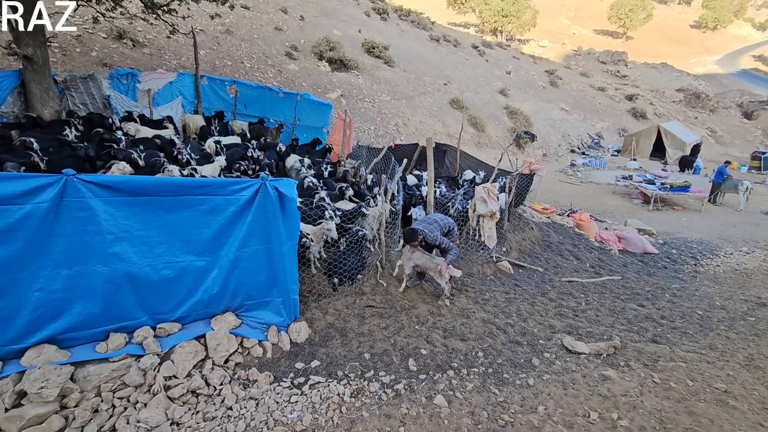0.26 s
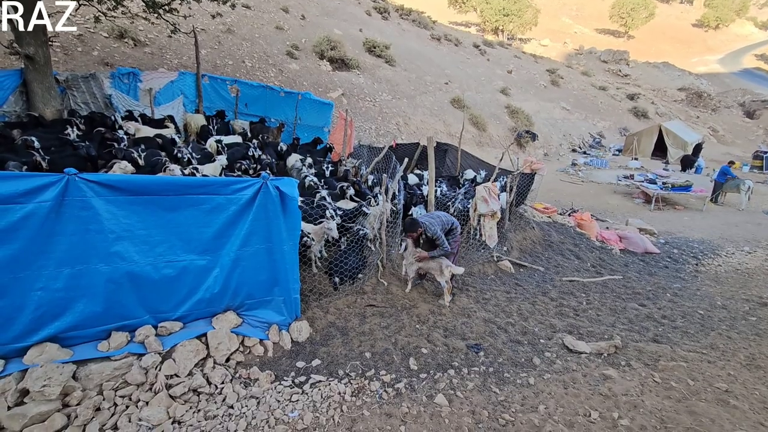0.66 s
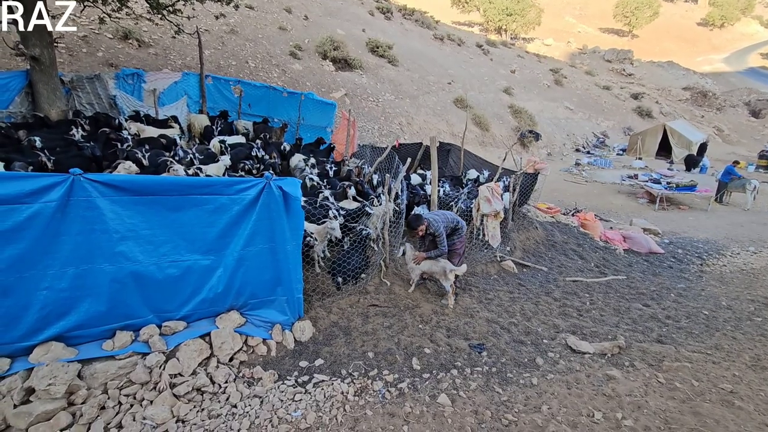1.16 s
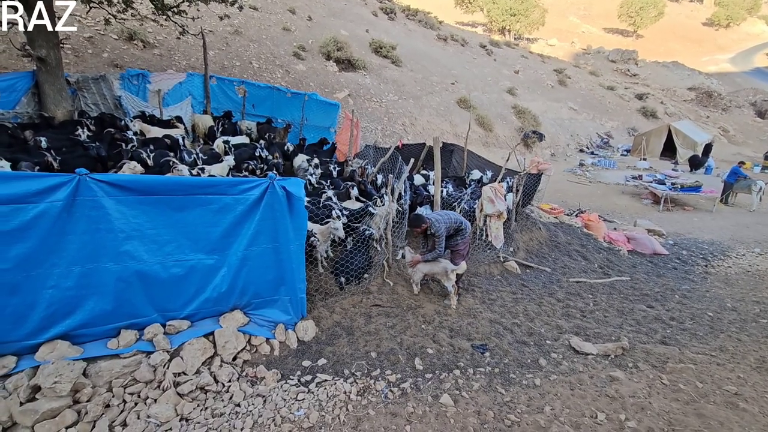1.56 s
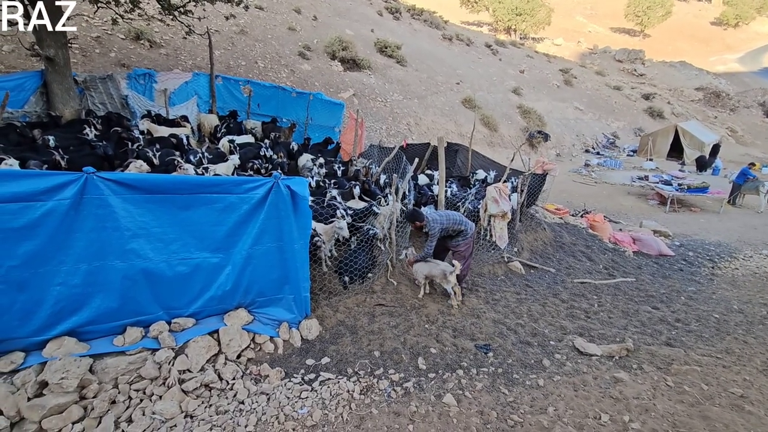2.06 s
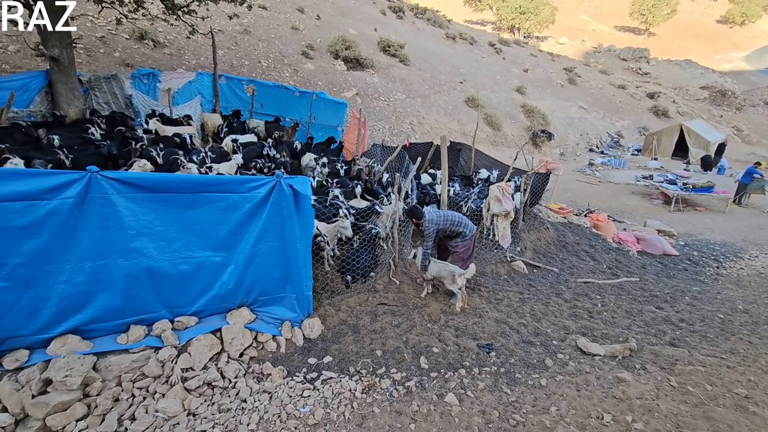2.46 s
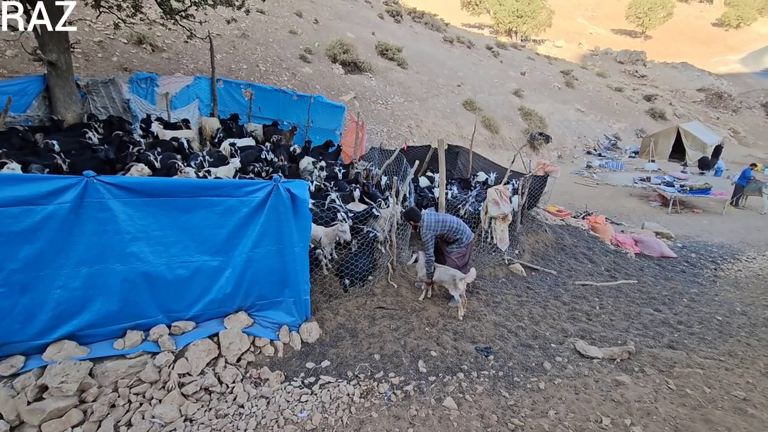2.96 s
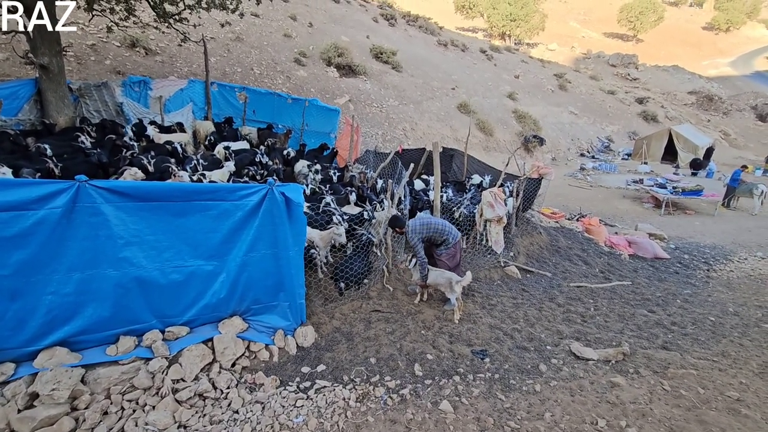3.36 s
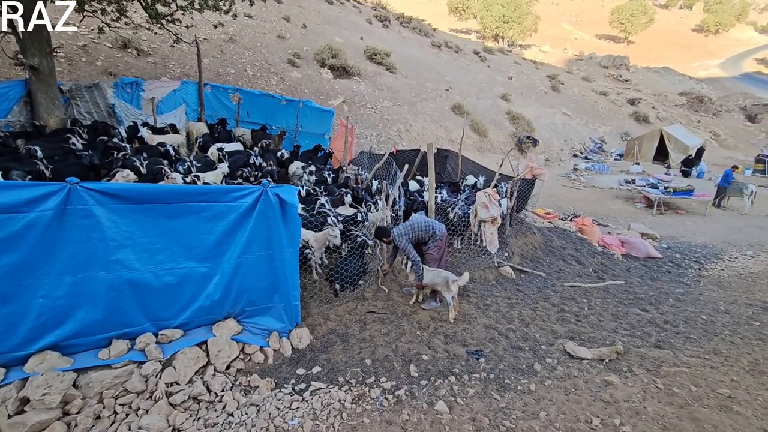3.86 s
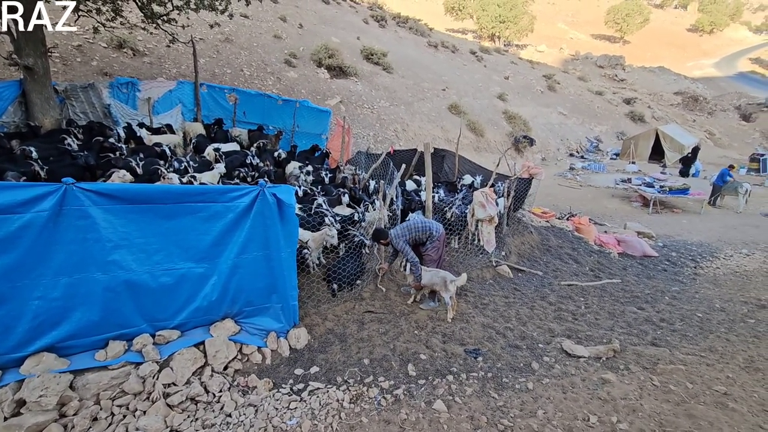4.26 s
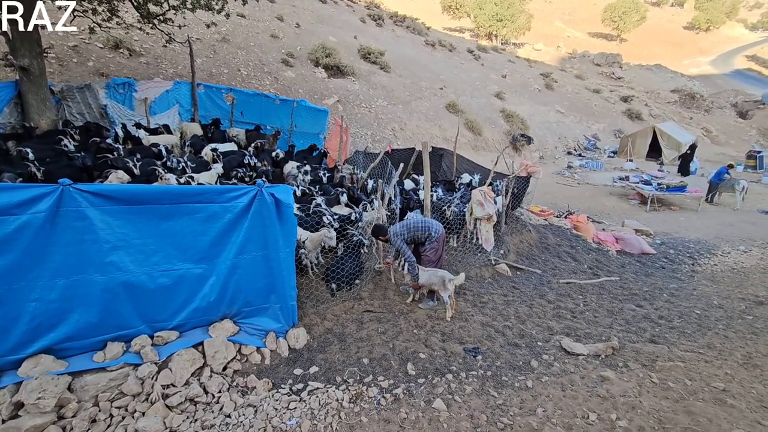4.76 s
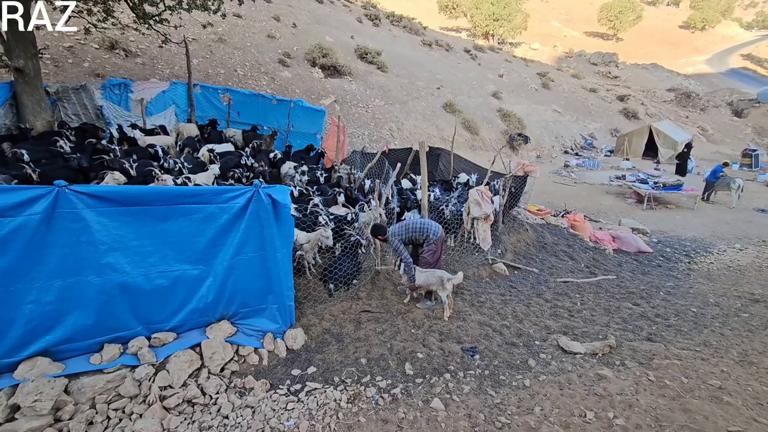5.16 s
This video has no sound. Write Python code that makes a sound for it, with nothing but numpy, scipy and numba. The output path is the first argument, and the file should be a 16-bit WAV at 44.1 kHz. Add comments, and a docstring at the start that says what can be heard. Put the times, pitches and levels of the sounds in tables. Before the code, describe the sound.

A young goat whimpers and gives one long bleat, then gritty footsteps, a small bell and one dog bark sound over a low outdoor rumble.

```python
"""A low, gusty rumble lies over a dry hillside, with dull shuffles around a pen. A young goat to the
right whimpers twice, then draws out one arching bleat that breaks at the top: vocal fold pulses through
moving throat resonances. Close by, grit snaps, feet scuff stony ground and a small collar bell tinkles.
Late on, a herd dog gives one gruff bark that the slopes throw back, a bird whistles faintly three
times, and a loose stone rocks against its neighbours."""
import sys
import numpy as np
from scipy import signal
from scipy.fft import rfft, irfft
from scipy.io import wavfile
from scipy.ndimage import uniform_filter1d, map_coordinates
from numba import njit

SR = 44100
rng = np.random.default_rng(int(sys.argv[2]) if len(sys.argv) > 2 else 0)


def output_pcm(signal):
    """Save a mono or channel-first signal as 16-bit PCM at the path in sys.argv[1].

    Samples are clipped to [-1, 1] before scaling.
    """
    pcm = np.clip(np.atleast_2d(signal).T, -1, 1) * 32767
    wavfile.write(sys.argv[1], SR, np.round(pcm).astype(np.int16))


N = 237950
T = np.arange(N) / SR

# closed-mouth notes, the first two run together: (start [s], end [s], pitch [Hz], level [dB],
# yelp time [s], yelp width [s], yelp rise [Hz], strain at the yelp [dB])
WHIMPER_NOTES = [(0.325, 0.375, 540, -55, .341, .016, 65.2, -9),
                 (0.385, .55, 562, -46.5, .411, 0.018, 71.3, -12.5),
                 (0.703, 0.919, 523, -44, .9, .036, 201, -26)]
# the long bleat: (time [s], level [dB], mouth opening [dB], strain in the upper harmonics [dB])
BLEAT_EFFORT = [(0.913, -45.5, -12.5, -24.5), (.96, -46.5, -12.5, -25), (1.02, -54, -8, -14),
                (1.07, -45.5, -16.5, -16), (1.12, -50.5, -6.5, -12), (1.458, -53, -5.5, -8),
                (1.6, -54, -2, -2.5), (1.75, -51.5, -8.5, -5), (1.85, -52.5, -13, -10),
                (1.99, -46.5, -14.5, -13), (2.025, -52, -14, -26)]
BREAK_S, CRACK_S = 1.508, 1.915  # the voice breaks atop the arch and cracks as the air runs out


def undb(db):
    """Decibels to gain."""
    return 10 ** (np.asarray(db) / 20)


def curves(rows):
    """The columns of a table, joined by straight lines in time."""
    s, *columns = np.transpose(rows)
    return [np.interp(T, s, c) for c in columns]


def after(s, fade):
    """A ramp from 0 to 1, centred on time s."""
    return np.clip((T - s) / fade + .5, 0, 1)


def blend(a, b, share):
    """Crossfade from a to b."""
    return a + (b - a) * share


def envelope(s, attack, hold, release, curve):
    """Full from s for the hold; attack and release are the times to 20 dB below that."""
    away = np.maximum(s - T, 0) / attack + np.maximum(T - s - hold, 0) / release
    return undb(-20 * np.minimum(away, 10) ** curve)


def unit(x):
    """Scale to rms 1."""
    return x / np.sqrt(np.mean(x ** 2))


def steady(x):
    """Hold the short-time rms at 1."""
    return x / np.sqrt(np.abs(uniform_filter1d(x * x, size=1300)) + 1e-12)


def noise():
    """White noise."""
    return rng.standard_normal(N)


def walk(rate):
    """Smooth random drift of rms 1 that turns about rate times a second."""
    drift = np.interp(T * rate, np.arange(N), noise())
    return unit(uniform_filter1d(drift, max(1, int(SR / rate))))


def band(x, lo_hz, hi_hz, order=4):
    """Band-pass."""
    sos = signal.butter(order, [lo_hz, min(hi_hz, SR / 2 - 1000)], "band", fs=SR, output="sos")
    return signal.sosfilt(sos, x + 1e-18)


def colour(x, points):
    """Minimum-phase EQ through points of (frequency [Hz], gain [dB])."""
    hz, db = np.transpose(points)
    size = 4096
    bins_hz = np.arange(size // 2 + 1) * SR / size
    log_gain = np.log(undb(np.interp(np.log(bins_hz + 1), np.log(hz), db)))
    cepstrum = irfft(log_gain) * np.r_[1, np.full(size // 2 - 1, 2), np.zeros(size // 2)]
    return signal.fftconvolve(x, irfft(np.exp(rfft(cepstrum))))[:N]


@njit
def resonance(x, hz, width):
    """State-variable band-pass whose centre moves, gain 1 at the centre."""
    y, mid, low = np.empty(len(x)), 0., 0.
    for i in range(len(x)):
        g, damping = np.tan(np.pi * hz[i] / SR), width / hz[i]
        v = (mid + g * (x[i] - low)) / (1 + g * (g + damping))
        mid, low = 2 * v - mid, low + 2 * g * v
        y[i] = damping * v
    return y


def formant(x, hz, width_hz):
    """A moving resonance with steep skirts."""
    return resonance(resonance(x, hz, float(width_hz)), hz, float(width_hz))


def place(x, lag_ms, pan_db):
    """Pan to stereo: the left is later by lag_ms and louder by pan_db."""
    late = map_coordinates(x, [np.arange(N) - lag_ms * SR / 1000], order=3)
    return np.array([late * undb(pan_db / 2), x * undb(-pan_db / 2)])


def outdoors(x, t60, wet_db, dull_hz):
    """Diffuse reverb from the ground and the slope, one tail for each side."""
    decay = undb(-60 * T / t60)
    tails = [unit(band(noise(), 220, dull_hz, order=1) * decay) / np.sqrt(N) for _ in range(2)]
    return undb(wet_db) * np.array([signal.fftconvolve(x, tail)[:N] for tail in tails])


def background():
    """A gusty rumble, the low stir of the flock and a faint breeze."""
    bed = [(0, -52.5), (1.3, -50.5), (2.6, -52.5), (3.7, -50.5), (5.39, -57)]  # rumble between gusts: (time [s], level [dB])
    gusts = [(.19, 5.5, 0.035), (.38, 10.5, 0.044), (.63, 9, 0.12), (.86, 6, 0.1), (1.8, 9, 0.35),
             (2.35, 5.5, .04), (4.16, 7, 0.042)]  # swells: (time [s], rise [dB], half length [s])
    rumble_eq = [(11, -45.5), (18, -7.5), (38, 2), (68, 0.5), (85, -2.5), (128, -23), (200, -30),
                 (260, -54.5), (440, -120)]  # deep bass: (frequency [Hz], gain [dB])
    air_eq = [(80, -10.5), (150, -13.5), (200, -7), (260, -1.5), (340, -11.5), (450, -18), (700, -6),
              (1000, -19), (2200, -25.5), (4000, -32), (8000, -40.5), (10000, -46.5), (16000, -43.5)]  # hillside air: (frequency [Hz], gain [dB])
    rumble_db = curves(bed)[0] + sum(db * np.exp(-((T - s) / half) ** 2) for s, db, half in gusts)
    common, apart = (unit(band(colour(noise(), rumble_eq), 19, 170)) for _ in range(2))
    rumble = undb(rumble_db) * (place(common, 0.24, -4) + undb(-13) * np.array([apart, -apart]))
    centre, left, right = (unit(colour(noise(), air_eq)) for _ in range(3))
    air = undb(-67.5) * (0.5 * centre + 0.82 * np.array([left, right]))
    stir = band(air, 90, 600, order=2) * undb(0.5 + 2.6 * walk(14))
    breeze = band(air, 960, 22000, order=2) * undb(1.36 * walk(30))
    return rumble + stir + breeze


def bumps():
    """Soft, dull shuffles around the pen: short swells of low noise."""
    shuffles = [(0.188, -69, 278, 0.31), (1.047, -62.5, 875, 0.041), (1.159, -61.5, 830, 0.068),
                (1.161, -60, 222.6, .08), (1.322, -63, 288, 0.041), (2.137, -51.5, 750, 0.014),
                (2.791, -50, 218, 0.18), (2.803, -67.5, 334, 0.46), (4.362, -56.5, 240, 0.1),
                (5.176, -62, 152, 0.49), (5.212, -64.5, 289, 0.73), (5.265, -57.5, 1070, 0.11)]  # (time [s], level [dB], rough top of the band [Hz], length [s])
    out = np.zeros(N)
    for s, db, hz, length in shuffles:
        swell = np.cos(np.pi * np.clip((T - s) / length, -.5, .5))
        out += undb(db) * swell * steady(band(noise(), hz * 0.59, hz * 0.99, order=2))
    return out


def larynx(hz, rough, jitter, shimmer, doubling, flutter_hz, breath, harmonics):
    """Vocal fold pulses; roughness unsettles them, alternates strong and weak, and adds puffs of air."""
    phase = 2 * np.pi * np.cumsum(hz * (1 + jitter * rough * walk(flutter_hz))) / SR
    pulses = unit(sum(np.cos(k * phase) for k in range(1, harmonics + 1)))
    size = 1 + rough * (shimmer * walk(flutter_hz) + doubling * np.cos(phase / 2) * walk(30))
    return pulses * size + breath * rough * noise() * (1 + np.cos(phase))


def whimpers():
    """Voice controls: sagging nasal notes, weak and hoarse at the ends; a yelp parts the lips."""
    sag_hz_per_s, scoop_hz, scoop_s = 430, 90, .022
    notes = np.array(WHIMPER_NOTES)
    current = np.maximum(np.searchsorted(notes[:, 0], T, side="right") - 1, 0)
    start, end, note_hz, db, yelp_s, width, rise_hz, yelp_db = notes[current].T
    yelp = np.exp(-((T - yelp_s) / width) ** 2)
    # the pitch slides up into each note and drops out of it
    scoop = np.exp(-np.maximum(np.minimum(T - start, end - T), 0) / scoop_s) * (1 - yelp)
    hz = note_hz - sag_hz_per_s * (np.clip(T, start, end) - start) + rise_hz * yelp - scoop_hz * scoop
    level_db = db - 9.5 * scoop - 3.5 * yelp
    mouth_db = blend(-33.5, -13.5, np.maximum(yelp, scoop))
    strain_db = blend(-27, yelp_db, yelp) + 14 * scoop
    lower_hz, upper_hz, upper_db = (np.full(N, value) for value in (1960, 3350, -30))  # the nose
    rough = .33 + .25 * scoop
    return np.array([hz, level_db, mouth_db, strain_db, lower_hz, upper_hz, upper_db, rough])


def bleat():
    """Voice controls: the throat follows the arch of the pitch, clear going up, hoarse coming down."""
    arch = [(0.918, 556.7), (1.002, 569.7), (1.124, 622.2), (1.508, 686), (1.644, 654.2), (1.786, 584),
            (1.9, 549.7), (2.002, 478), (2.01, 482.6)]  # the bleat's melody: (time [s], pitch [Hz])
    mid_hz, quaver_hz = 606, 68.85
    hz, = curves(arch)
    level_db, mouth_db, strain_db = curves(BLEAT_EFFORT)
    opened, broken, cracked = after(0.95, 0.077), after(BREAK_S, 0.058), after(CRACK_S, 0.011)
    # two resonances lie wide apart, ride the pitch once the mouth opens, then jump at the crack
    lower_hz = blend(blend(2220, 2470 + 1.9 * (hz - mid_hz), opened), 2520, cracked)
    upper_hz = blend(blend(3950, 3124 + 3.8 * (hz - mid_hz), opened), 3570, cracked)
    upper_db = blend(-3.5, 4, np.maximum(cracked, breaking()))
    rough = blend(blend(.11, .26, broken), .52, cracked)
    tired = np.clip((T - BREAK_S) / (CRACK_S - BREAK_S), 0, 1)
    quaver = np.sin(2 * np.pi * np.cumsum(quaver_hz * (1 + 0.087 * walk(20))) / SR)
    hz = hz * (1 + .016 * tired * quaver)
    return np.array([hz, level_db, mouth_db, strain_db, lower_hz, upper_hz, upper_db, rough])


def breaking():
    """The break in the voice: sudden, held briefly, then easing."""
    return envelope(BREAK_S + 0.0059, attack=0.0034, hold=.1, release=0.095, curve=0.77)


def goat():
    """A nearly pure hum with the mouth shut; opening and strain bring out the upper resonances."""
    throat_eq = [(330, -41), (480, 0), (680, -6.5), (880, -28.5), (1250, -4.5), (1600, -22), (2500, 0),
                 (4100, -28), (4750, -2.5), (5500, -46)]  # the goat's throat: (frequency [Hz], gain [dB])
    shrill_eq = [(5500, -15), (6200, -7), (7300, 3), (8300, -14), (8900, -6), (10500, -25.5), (11500, -4.5),
                 (12300, -30), (13500, -16), (15500, -39.5)]  # the voice's shrill edge: (frequency [Hz], gain [dB])
    bleat_start, bleat_end = BLEAT_EFFORT[0][0], BLEAT_EFFORT[-1][0]
    bleating = after(bleat_start, 0.011)
    controls = blend(whimpers(), bleat(), bleating)
    hz, level_db, mouth_db, strain_db, lower_hz, upper_hz, upper_db, rough = controls
    hz = hz * (1 + 0.0065 * walk(40))  # slight waver
    folds = larynx(hz, rough, jitter=.05, shimmer=.4, doubling=.6,
                   flutter_hz=420, breath=.7, harmonics=23)
    throat = colour(folds, throat_eq)
    cracking = envelope(CRACK_S + 0.018, attack=0.11, hold=.04, release=0.041, curve=1)
    # the next resonance of the throat tube moves with the one below it
    overtone = undb(-3.5) * (1 - cracking) * formant(folds, 1.41 * upper_hz, 480)
    upper = formant(folds, lower_hz, 260) + undb(upper_db) * (formant(folds, upper_hz, 350) + overtone)
    hum = steady(band(throat, 400, 826))
    mouth = undb(mouth_db + 1.5) * steady(band(throat, 826, 1730))
    husk = undb(-19.5) * unit(band(noise(), 1400, 4800, order=2))  # escaping air
    strain = undb(strain_db - 1) * (steady(upper) + husk)
    shrill = steady(band(colour(folds, shrill_eq), 5700, 14000))
    shrill_gain = undb(level_db + strain_db - 27.5) * bleating
    shrill_gain += undb(-64) * breaking() + undb(-73) * cracking
    squeal = undb(-73.5) * cracking * steady(formant(folds, 2 * upper_hz, 800))
    spans = [row[:2] for row in WHIMPER_NOTES] + [(bleat_start, bleat_end)]
    gate = np.minimum(sum(after(start, 0.0046) - after(end, 0.016) for start, end in spans), 1)
    voice = gate * undb(level_db) * (hum + mouth + strain)
    edge = gate * (shrill_gain * shrill + squeal)
    direct = place(voice, .31, -4.5) + place(edge, 0.289, 6.2)
    return direct + outdoors(voice + edge, t60=.25, wet_db=-17, dull_hz=5000)


def grit(rate, spread_db):
    """Tiny clicks of very unequal size, about rate a second."""
    clicks = (rng.random(N) < rate / SR) * noise()
    return unit(clicks * undb(spread_db * np.minimum(rng.exponential(size=N), 4)))


def scatter(eq, rate, spread_db):
    """Fine grains spread wide, with a quieter layer in the centre."""
    centre, left, right = (unit(colour(grit(rate, spread_db), eq)) for _ in range(3))
    return 0.36 * centre + np.array([left, right])


def snaps():
    """Single bits of grit crack underfoot and briefly crumble."""
    cracks = [(0.4555, -47.5, -20, 0.056), (0.4746, -56.5, -2, 0.096), (2.0799, -63.5, -22, 0.29),
              (2.133, -43, -7, 0.093), (2.527, -47, -12, 0.06), (2.7057, -38.5, -10, 0.088),
              (2.827, -46, -2, 0.041), (2.8634, -56, -18, 0.05), (3.34, -54, -10, 0.041),
              (3.43, -49, -21, 0.04), (3.586, -50, -8.5, 0.1), (4.1126, -58, -14, 0.07),
              (5.057, -52.5, -16, 0.042), (5.1282, -40, -12.5, 0.081)]  # (time [s], level [dB], relative body [dB], t60 [s])
    crack_eq = [(1180, -36), (2000, 4), (2440, -8), (2970, 3), (3660, -4.5), (4160, 1.5), (4950, -2),
                (6250, -1.5), (7550, -5.5), (11900, -12), (15700, -24)]  # brittle grit: (frequency [Hz], gain [dB])
    crack, body = np.zeros(N), np.zeros(N)
    for s, db, body_db, t60 in cracks:
        burst = np.clip((T - s) / 0.0011, 0, 1) * undb(db - 60 * np.maximum(T - s, 0) / t60)
        crack += burst
        body += burst * undb(body_db)
    bright = undb(-9) * crack * scatter(crack_eq, rate=9000, spread_db=4.5)
    dull = undb(-5.5) * body * unit(band(noise(), 470, 1900, order=2))
    return bright + place(dull, -0.17, 1)


def scuffs():
    """Soles grind gravel, sand and dust; each drag swells and dies away."""
    drags = [(1.22, 0.28, 0.32, -73, -80.5, -85), (2.548, .04, 0.081, -64.5, -77, -81),
             (2.654, 0.076, 0.074, -56, -72, -80), (2.748, 0.069, 0.12, -48, -57.5, -66),
             (3.4, 0.54, 0.46, -82.5, -72, -80), (3.7, 0.039, 0.044, -70.5, -74, -87),
             (3.975, 0.15, 0.16, -72, -79, -83), (4.13, 0.13, 0.34, -77, -77, -79.5),
             (5.126, 0.29, 0.17, -74, -69.5, -71.5), (5.385, 0.21, 0.059, -69, -84, -83.5)]  # (peak time [s], rise [s], fall [s], gravel [dB], sand [dB], dust [dB])
    gravel_eq = [(90, -24), (220, 6.5), (380, -9), (650, 5), (1100, -10.5), (1700, -11.5), (2250, -6),
                 (3500, -5.5), (6000, -24), (12000, -52)]  # crunch: (frequency [Hz], gain [dB])
    sand_eq = [(1200, -25.5), (2200, -11.5), (3500, -6), (5000, -6), (7200, -5.5), (8500, -10.5),
               (11000, -39)]  # hiss: (frequency [Hz], gain [dB])
    dust_eq = [(6000, -28.5), (8500, -3.5), (12000, 2.5), (16000, -5.5)]  # fizz: (frequency [Hz], gain [dB])
    swells = np.array([envelope(s, rise, 0, fall, curve=1.28) for s, rise, fall, *_ in drags])
    on_gravel, on_sand, on_dust = undb(np.array(drags)[:, 3:]).T @ swells
    gravel = on_gravel * unit(colour(grit(rate=900, spread_db=2.8), gravel_eq))
    sand = on_sand * scatter(sand_eq, rate=3000, spread_db=1)
    dust = on_dust * scatter(dust_eq, rate=9600, spread_db=3.5)
    return place(gravel, -0.13, 0.93) + sand + dust


def bell():
    """A small tin bell on a collar, damped by the neck it swings against."""
    strokes = [(2.2257, -63.5, 1, 0.19), (2.3193, -62, -6.5, 0.22), (3.912, -59.5, 4, 0.06),
               (3.929, -62, 3, 0.052), (4.035, -59.5, 10, 0.055), (4.1113, -56.5, 0.5, 0.05),
               (4.192, -59.5, 2, 0.18), (4.3097, -69, -8, 0.057), (5.1425, -54.5, 6, 0.11),
               (5.3354, -60, -9, 0.085)]  # clapper hits: (time [s], level [dB], left minus right [dB], ring [s])
    modes = [(2540, -13, .8), (2786, -8.5, 0.84), (2885, -0.5, 0.83), (8060, -21.5, 1.3), (8700, -24, 1)]  # tin shell: (frequency [Hz], level [dB], t60 over ring time [ratio])
    age = np.arange(int(.3 * SR)) / SR
    out = np.zeros((2, N))
    for s, db, pan_db, ring in strokes:
        note = np.zeros(len(age))
        for hz, mode_db, share in modes:
            decay = undb(db + mode_db - 60 * age / (ring * share))
            note += decay * np.sin(2 * np.pi * (hz * age + rng.random()))
        chatter = undb(4.7 * walk(220)[:len(age)])  # the clapper keeps brushing the rim
        note *= chatter * np.minimum(age / 0.0023, 1)
        out += undb([[pan_db / 2], [-pan_db / 2]]) * np.pad(note, (int(s * SR), N))[:N]
    return out + outdoors(out[0], t60=0.25, wet_db=-9, dull_hz=7000)


def dog():
    """One hoarse bark: the jaw opens after the chest note has begun, and the slopes answer."""
    contour = [(4.32, 379.8, 1820), (4.365, 444.1, 1700), (4.40, 487.4, 1470), (4.43, 496, 1407),
               (4.47, 487.2, 1300), (4.52, 485, 1320)]  # the bark: (time [s], pitch [Hz], mouth resonance [Hz])
    throat_eq = [(120, -26.5), (250, -13.5), (330, -8.5), (410, -5), (460, 3), (510, -7.5), (600, -6),
                 (880, -16.5), (995, -4.5), (1150, -24), (1700, -25.5), (2000, -4), (2480, -42.5),
                 (2950, -27.5), (4100, -51.5), (5200, -34.5), (6500, -52.5)]  # the dog's throat: (frequency [Hz], gain [dB])
    echoes = [(0.224, -19.5), (0.367, -29.5)]  # slaps off the slopes: (delay [s], level [dB])
    bark_s, jaw_lag_s = 4.395, 0.019
    hz, mouth_hz = curves(contour)
    folds = larynx(hz, rough=0.91, jitter=.05, shimmer=0.81, doubling=0.47,
                   flutter_hz=299, breath=1.72, harmonics=14)
    throat = colour(folds, throat_eq)
    push = envelope(bark_s, attack=0.046, hold=0.067, release=0.068, curve=1.44)
    opening = envelope(bark_s + jaw_lag_s, attack=0.038, hold=0.043, release=0.092, curve=1.12)
    chest = undb(-38.5) * push * steady(band(throat, 120, 740))
    mouth = band(throat, 760, 1460) + undb(-8) * formant(folds, mouth_hz, 210)
    jaw = undb(-38) * opening * steady(mouth)
    rasp = undb(-52.5) * opening ** 1.18 * steady(band(throat, 2205, 6200))
    bark = chest + jaw + rasp
    thin = band(bark, 1100, 4700, order=1)
    echo = sum(undb(db) * np.interp(T - delay, T, thin, left=0) for delay, db in echoes)
    direct = place(chest, 0.42, 0.6) + place(jaw + rasp, 0.38, 5.5)
    slopes = outdoors(echo, t60=0.91, wet_db=-2.5, dull_hz=3060)
    slopes += outdoors(jaw + rasp, t60=1.4, wet_db=-20, dull_hz=3500)
    return direct + outdoors(bark, t60=0.32, wet_db=-13.5, dull_hz=2970) + undb(-6.5) * slopes


def bird():
    """Three faint whistles from the hillside, each a short rising sine."""
    whistles = [(4.73, -71.5), (4.988, -69.5), (5.256, -71)]  # (time [s], level [dB])
    out = np.zeros(N)
    for s, db in whistles:
        progress = np.clip((T - s) / 0.056, 0, 1)
        hz = 2150 + 330 * progress
        out += undb(db) * np.sin(np.pi * progress) * np.sin(2 * np.pi * np.cumsum(hz) / SR)
    return out + outdoors(out, t60=0.12, wet_db=-9, dull_hz=6000)


def stones():
    """A loose stone rocks against its neighbours: dead, hollow knocks with a bright click."""
    knocks = [(5.201, -54.5, -9.5), (5.233, -50, -3.5), (5.251, -47, 0), (5.258, -42.5, -36),
              (5.278, -39, -14.5), (5.298, -53, -12), (5.319, -56.5, -19)]  # (time [s], level [dB], relative click [dB])
    modes = [(770, -1, 0.028), (1140, -2.5, 0.018), (1327, 9, 0.011), (1570, -30, .011),
             (1970, -35, 0.0082)]  # knocks ring a little sharp of these: (frequency [Hz], level [dB], t60 [s])
    out = np.zeros(N)
    bright = unit(band(noise(), 3030, 4170, order=2))
    for s, db, click_db in knocks:
        age = np.clip(T - s, 0, .2)
        ring = sum(undb(mode_db - 60 * age / t60) * np.sin(2 * np.pi * hz * rng.uniform(1, 1.046) * age)
                   for hz, mode_db, t60 in modes)
        click = (T >= s) * bright * undb(click_db - 60 * age / 0.037)
        out += undb(db) * (click - .55 * ring)
    return place(out, -0.086, 0.81) + outdoors(out, t60=0.13, wet_db=-10, dull_hz=4060)


def scene():
    """The whole hillside in stereo."""
    return goat() + dog() + bell() + bird() + scuffs() + snaps() + stones() + bumps() + background()


def record(dry):
    """A steep low-pass takes off the very top."""
    top_hz = 15800
    return signal.sosfilt(signal.ellip(10, .2, 70, top_hz, fs=SR, output="sos"), dry)


dry = scene()
out = record(dry)
output_pcm(out)
```